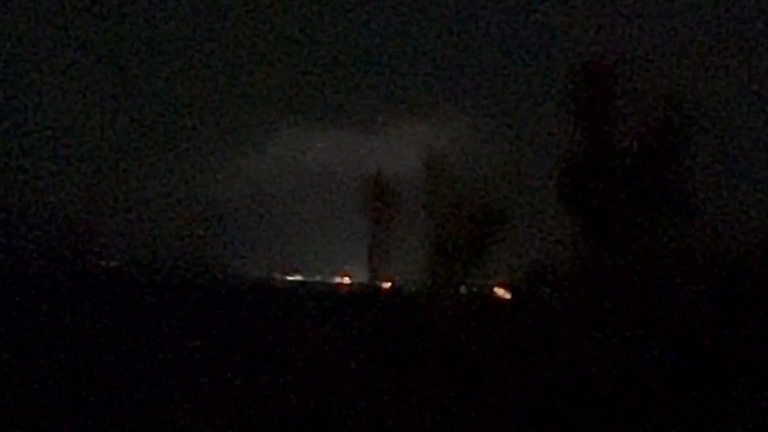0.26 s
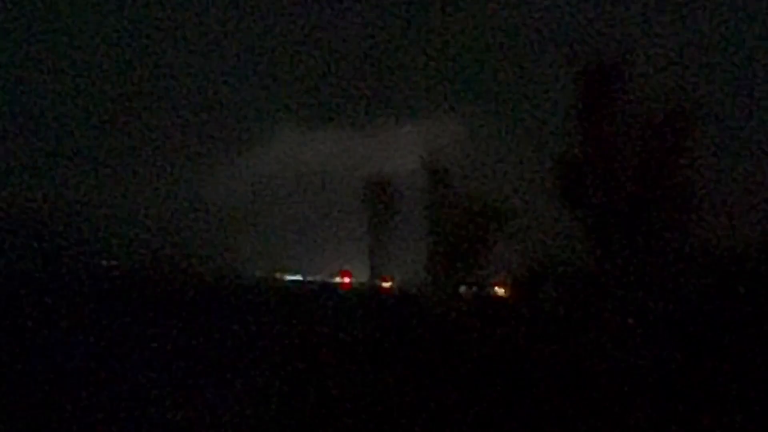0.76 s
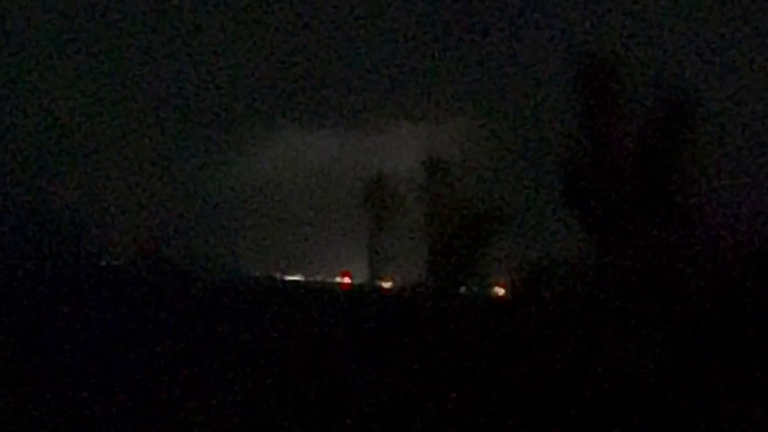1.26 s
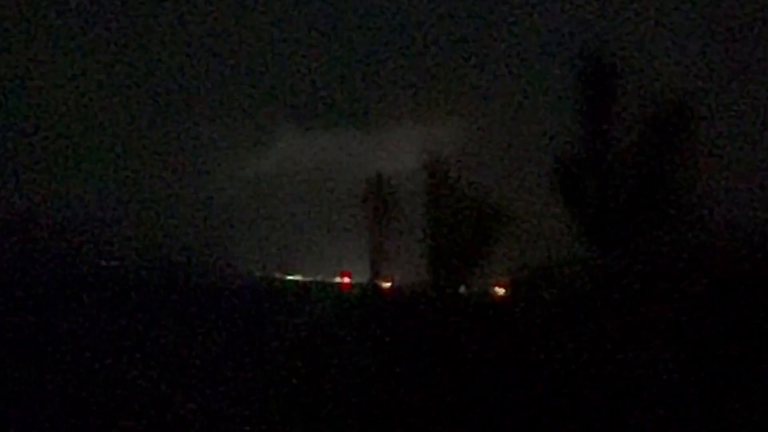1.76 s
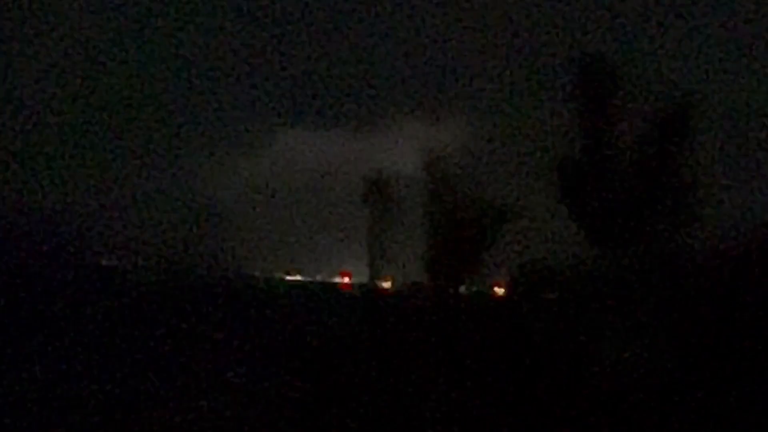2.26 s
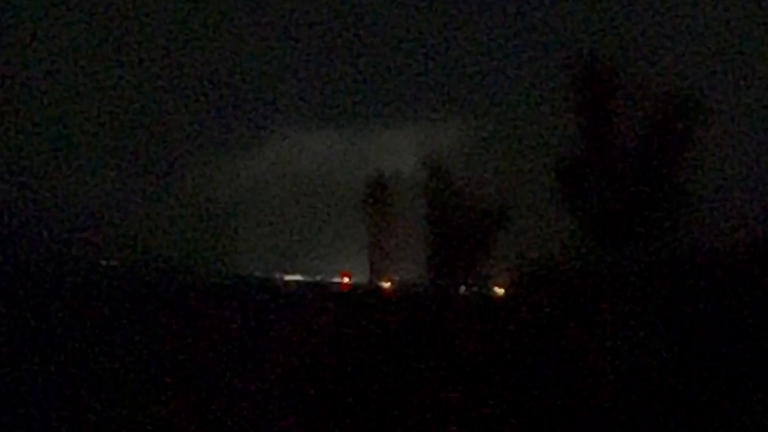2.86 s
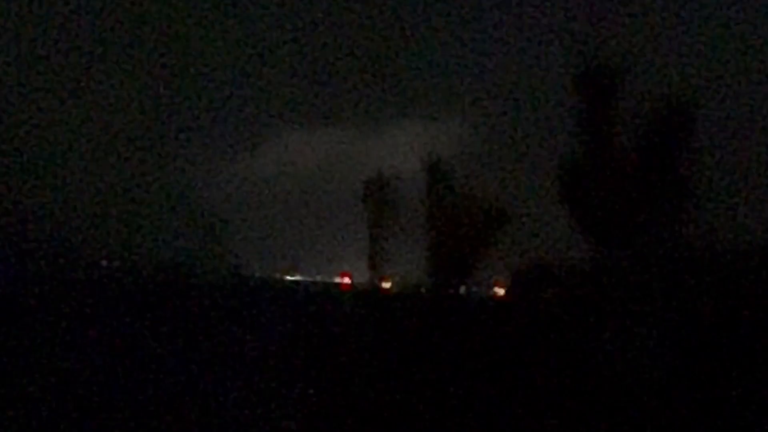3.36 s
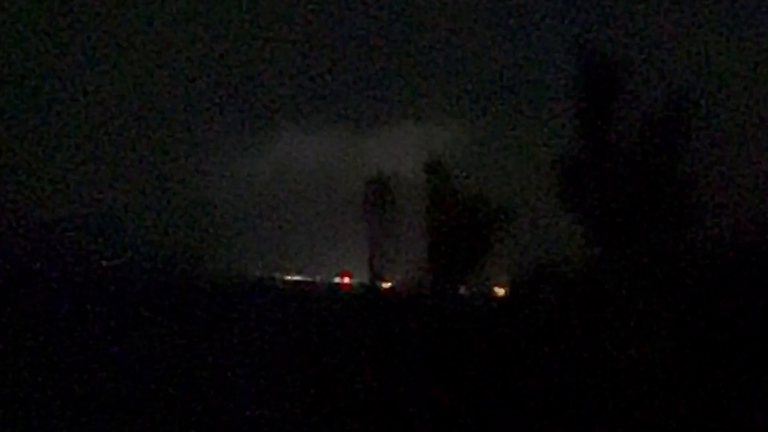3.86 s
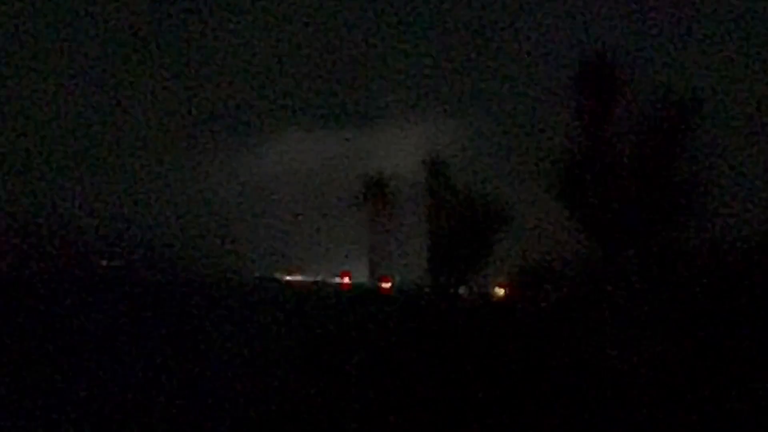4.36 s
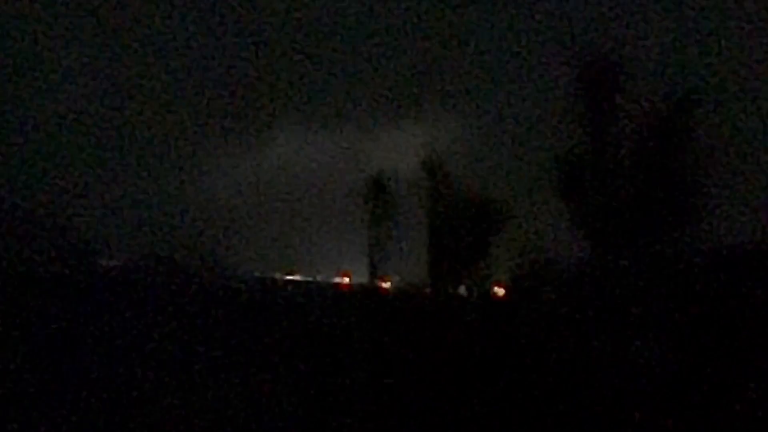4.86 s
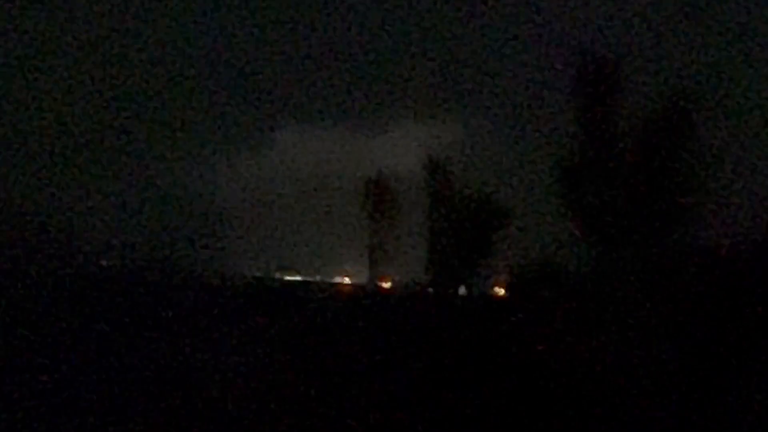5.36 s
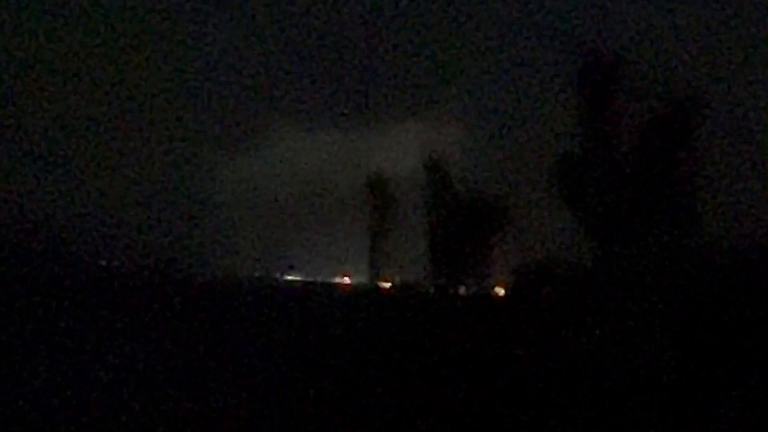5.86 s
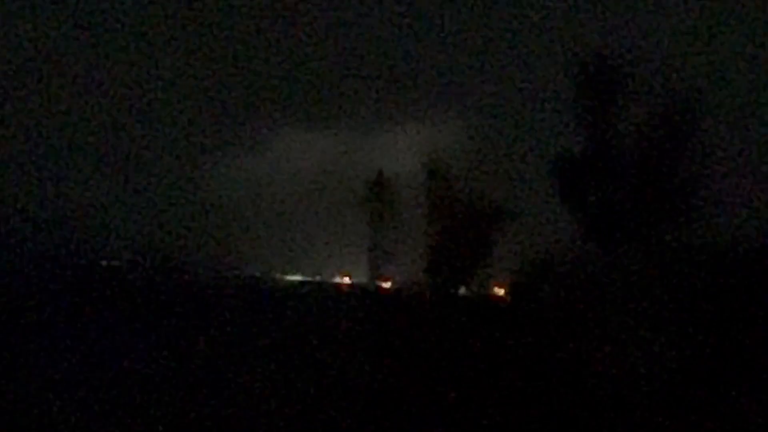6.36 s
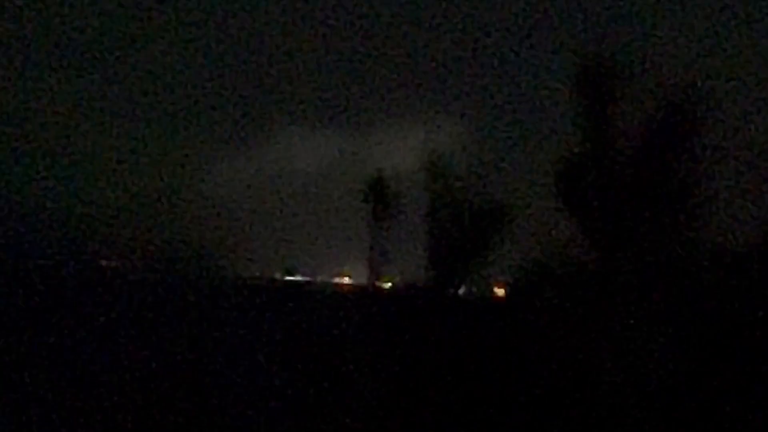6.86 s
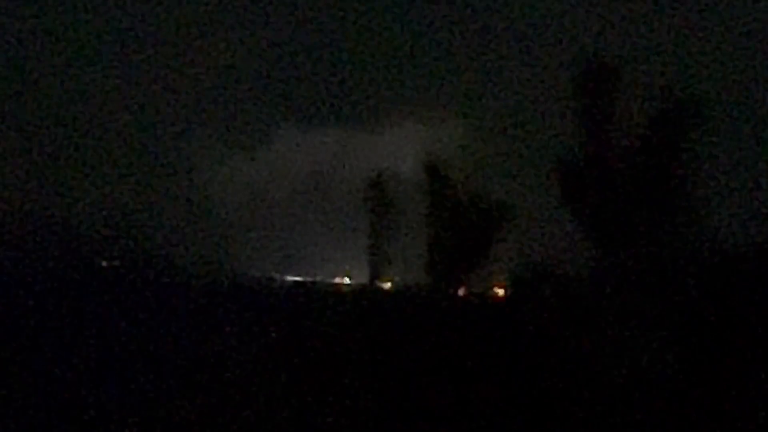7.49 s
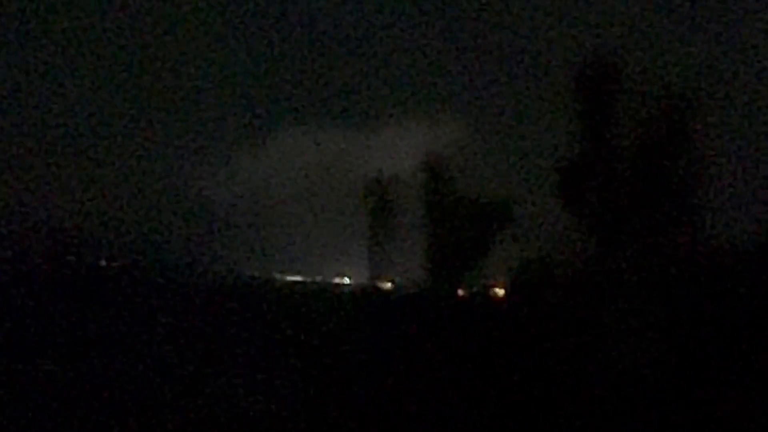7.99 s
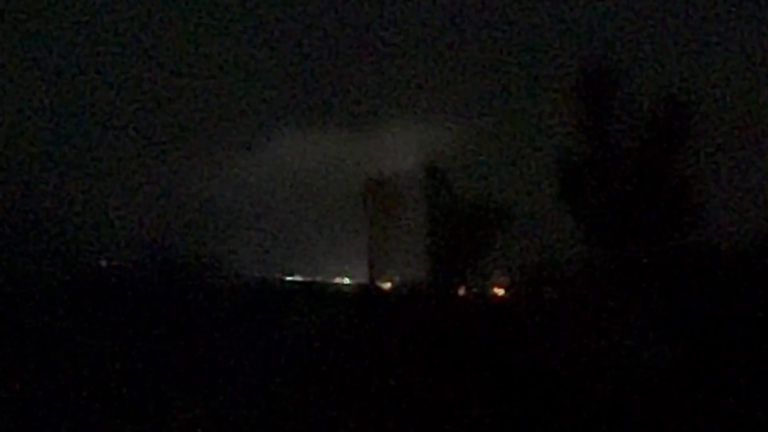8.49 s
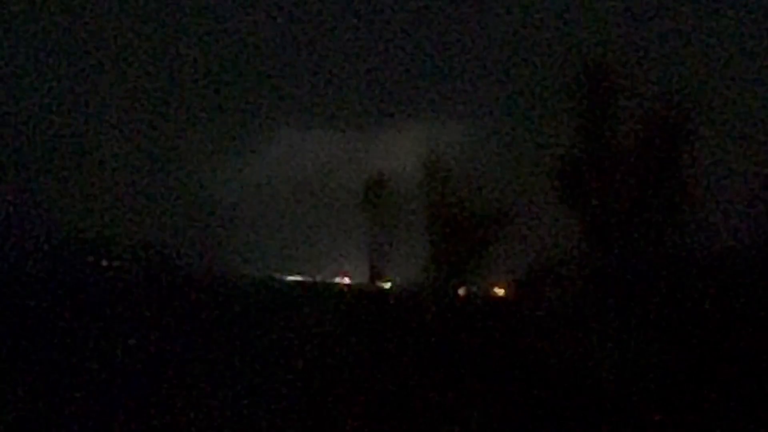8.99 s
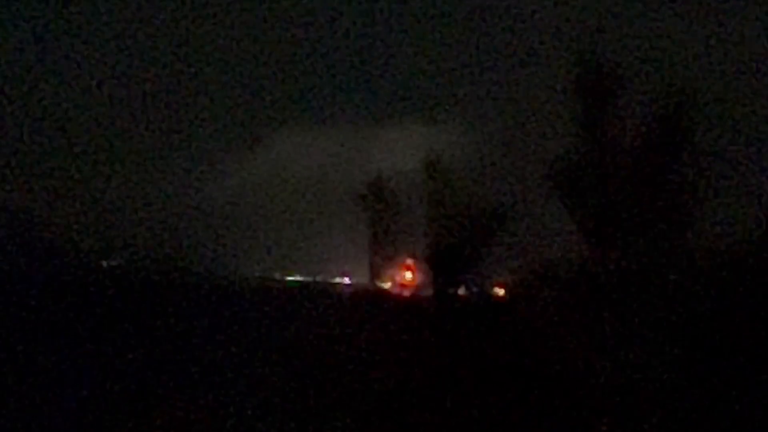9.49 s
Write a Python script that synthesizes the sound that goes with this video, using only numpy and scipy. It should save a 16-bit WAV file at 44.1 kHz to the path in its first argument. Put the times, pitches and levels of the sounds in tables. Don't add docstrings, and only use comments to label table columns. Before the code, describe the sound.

A dense cricket chorus trills over a dark field with faint far-road hum, while distant fireworks thud softly, strongest near seven seconds.

```python
import sys
import numpy as np
from scipy import signal
from scipy.fft import rfft, irfft, next_fast_len
from scipy.io import wavfile
from scipy.ndimage import map_coordinates

SR = 44100
rng = np.random.default_rng(int(sys.argv[2]) if len(sys.argv) > 2 else 0)


def magnitude_from_level(level_db):
    exponent = np.asarray(level_db, float) / 20
    return 10 ** exponent


def generate_wav(signal):
    frames = np.transpose(np.atleast_2d(signal))
    scaled = np.clip(frames, -1, 1) * 32767
    pcm = np.round(scaled).astype(np.int16)
    wavfile.write(sys.argv[1], SR, pcm)


N = 429093

# [f/Hz, density/dB]
AIR_COLOUR = [(100, -20), (170, 0), (600, -1), (1200, -6), (1600, -11), (1950, -10), (2700, -15),
              (4000, -18), (5000, -12), (6500, -13), (7300, -20), (8100, -28), (10000, -29), (12500, -33),
              (14500, -37), (16000, -36)]
# [f/Hz, likeness 0-1]
AIR_LIKENESS = [(60, 0.2), (170, 0.98), (500, 0.84), (1000, 0.34), (1550, 0), (1900, 0.74), (4000, 0.8),
                (6000, 1), (6900, 0.1), (7600, 0.58)]
# [t/s, level/dB]
ROAD_LEVEL = [
    (0, -54),
    (.92, -55.5),
    (2.65, -55),
    (3.06, -56.5),
    (4.66, -55),
    (5.85, -56),
    (6.48, -54.5),
    (7.07, -56),
    (9.73, -55.5),
]
# [f/Hz, density/dB]
ENGINE_COLOUR = [(22, -34), (35, -19), (48, -4), (61, 4), (74, -5), (86, 1), (100, -9), (125, -12),
                 (150, -11), (200, -40)]
# [t/s, level/dB]
ENGINE_LEVEL = [
    (0, -48),
    (.24, -58),
    (.73, -56.5),
    (4.5, -56.5),
    (6.72, -55.5),
    (7.45, -54),
    (8.7, -56),
    (9.73, -58.5),
]
# [t/s, peak level/dB, pitch f/Hz, cycles, rolling tail level/dB]
BLASTS = [(0.142, -39.5, 64, 3.6, -7), (0.349, -40, 60, 3.4, -10), (0.503, -40, 49, 3, -16),
          (.705, -44, 70, 3.3, -15), (6.879, -36.5, 205, 4.7, 0.5), (6.8897, -20.5, 115, 1.25, -19),
          (6.9005, -27.5, 68, 1.6, -14), (6.92, -27.5, 62, 2.2, -13), (7.135, -41, 68, 3.5, -12),
          (6.968, -52, 62, 2.1, 4.5), (7.01, -34, 80, 0.73, -21), (7.096, -45, 110, 2.4, -8.5),
          (7.294, -37.5, 75, 1.9, -13.5), (7.999, -40.5, 59, 3.8, -12.5), (8.61, -41, 47.6, 3.5, -15),
          (8.759, -43.5, 77, 2.7, -10), (9.456, -38, 65.4, 1.8, -19)]
# [f/Hz, t60/s]
ROLL_DECAY = [(40, 1), (90, 1), (200, 0.31), (500, 0.41)]
# [f/Hz, density/dB]
ROLL_TONE = [(30, -15.5), (60, 13), (100, -14), (250, -10.5), (500, -20.5), (900, -69)]
# [t/s, strokes made so far]
RASP_PACE = [
    (.047, 0),
    (1.038, 13),
    (1.94, 25),
    (2.45, 32),
    (3.482, 46),
    (4.185, 56),
    (5.007, 68),
    (5.337, 73),
    (5.52, 76),
]
# [start t/s, end t/s, level/dB]
FAST_RUNS = [(5.56, 5.75, -59), (5.79, 5.82, -58), (5.86, 6.13, -59), (6.17, 6.54, -59), (6.57, 6.86, -58),
             (6.88, 6.95, -63), (6.967, 7.237, -60), (7.257, 7.296, -60), (7.36, 7.56, -61),
             (7.58, 7.607, -60), (7.78, 7.8, -62), (8.7, 8.78, -63), (9.38, 9.45, -64), (9.626, 9.663, -60)]
# [f/Hz, density/dB]
RASP_TONE = [(11500, -20), (12400, -5), (13300, -2.5), (14100, 11), (14800, 6), (15400, 10.5), (17000, -4)]
# [first stroke t/s, end t/s, strokes per s]
BUZZES = [
    (.01, 1.71, 38.),
    (1.893, 9.73, 38.17),
]
# [start t/s, length/s, first f/Hz, last f/Hz, peak level/dB]
SOFT_TRILLS = [(.05, .47, 4590, 4490, -52), (.5, .56, 4480, 4450, -62), (.8, .42, 4570, 4520, -49.5),
               (0, .45, 4440, 4430, -54), (1.09, .66, 4470, 4380, -54), (1.31, .32, 4790, 4710, -55.5),
               (2.52, .44, 4790, 4710, -55.5), (3.49, .45, 4790, 4710, -57), (4.41, .5, 4780, 4710, -56.5),
               (5.36, .55, 4790, 4710, -56.5), (6.35, .45, 4780, 4710, -57), (8.3, .45, 4580, 4490, -51),
               (8.7, .5, 4480, 4490, -61), (9.16, .5, 4570, 4500, -49), (9.5, .23, 4490, 4440, -57)]
# [last stroke t/s, first stroke level/dB, lead-in earlier by/s, lead-in level/dB]
HIGH_VOICE = [(.204, -44, .164, -50), (.808, -44, .255, -49), (2.167, -46, .238, -48),
              (2.714, -44, .254, -50), (3.946, -47, .246, -50), (4.409, -44, .166, -48),
              (5.01, -44, .26, -50), (6.324, -46, .251, -48), (6.876, -44, .246, -51),
              (8.374, -46, .247, -48), (8.95, -44, .253, -47)]
# [t/s, peak level/dB]
LONE_LEAD_INS = [
    (1.65, -52),
    (3.2, -53),
    (7.975, -49),
]
# [t/s, peak level/dB of the overtone]
LOW_VOICE = [(0.151, -59), (0.274, -60), (0.673, -59), (0.819, -56), (0.913, -55), (2.237, -57),
             (2.385, -64), (2.449, -60), (2.861, -61), (3.021, -58), (4.422, -58), (4.567, -57),
             (5.004, -58), (5.067, -53), (5.188, -63), (6.097, -60), (6.437, -58), (6.578, -59),
             (6.643, -60), (7.132, -58), (7.287, -54), (7.408, -64), (7.712, -60), (8.511, -55),
             (8.651, -58), (8.718, -62), (9.185, -58), (9.334, -58), (9.453, -65)]
# [f/Hz, level/dB]
SINGERS = [(4890, -22), (4990, -24), (5090, -15.5), (5190, -11.5), (5270, -5.5), (5350, -4.5), (5420, -3),
           (5480, -1.5), (5520, 2), (5580, -16.5), (5650, -9), (5710, -10.5), (5780, -20), (5890, -25)]
# [t/s, depth/dB]
CHORUS_LULLS = [(.13, 3.5), (.44, 3.5), (.71, 3.5), (1.11, 5.5), (1.4, 2.5), (1.55, 5), (2.12, 4.5),
                (2.46, 5.5), (2.75, 3), (3.1, 1.5), (3.37, 3.5), (3.65, 0), (4.08, 4), (4.38, 3), (4.72, 6),
                (5.03, 4), (5.22, 4), (5.51, 3.5), (5.69, 3), (5.88, 2.5), (6.17, 1), (6.78, 5), (7.07, 1),
                (7.39, 2.5), (7.75, 1.5), (8.11, 5.5), (8.41, 4), (9.09, 2.5), (9.37, 5), (9.63, 7)]
# [first stroke t/s, last stroke t/s, peak level/dB]
NEAREST_SINGER = [(0.256, .285, -27), (.387, .387, -26.5), (0.764, .79, -30), (0.837, .886, -33),
                  (1.901, 2.037, -27.5), (2.25, 2.27, -26), (2.318, 2.374, -27.5), (2.808, 2.806, -30),
                  (2.881, 2.955, -30.5), (3.039, 3.039, -28), (3.222, 3.249, -29.5), (3.495, 3.495, -40),
                  (3.751, 3.753, -31), (4.188, 4.207, -28.5), (4.316, 4.317, -24), (4.453, 4.503, -30.5),
                  (4.638, 4.661, -27), (4.799, 4.981, -28.5), (5.11, 5.157, -28.5), (5.93, 5.93, -26),
                  (6.054, 6.08, -34), (6.3, 6.373, -31), (6.547, 6.622, -28), (6.836, 6.861, -29.5),
                  (7.464, 7.539, -28.5), (8.219, 8.245, -28.5), (8.352, 8.351, -31), (8.639, 8.639, -30),
                  (8.993, 8.993, -24), (9.201, 9.284, -28)]
# [f/Hz, lead/rad]
LEFT_LEAD = [(400, 0), (1400, 1), (1750, 5.8), (2600, 8.7), (3900, 7.1), (4450, 7.75), (5080, 7.85),
             (5500, 8.8), (5860, 9.4), (6050, 9.78), (6900, 10.4), (7300, 12.5), (8200, 12.6), (9750, 15.7),
             (10300, 15.7), (12300, 18.8), (12850, 18.9), (15700, 23.2)]
# [f/Hz, level difference/dB]
LEFT_TILT = [(380, 0), (700, 3), (1290, 4.5), (2380, 1.5), (4400, 0)]


def unit(x):
    return x / np.sqrt(np.mean(x ** 2) + 1e-20)


def along(points, hz):
    f, v = np.transpose(points)
    return np.interp(np.log(hz + 1), np.log(f + 1), v)


def curve(rows):
    return np.interp(np.arange(N) / SR, *np.transpose(rows))


def filtered(x, response):
    m = next_fast_len(N + 8192)
    return irfft(rfft(x, m) * response(np.fft.rfftfreq(m, 1 / SR)), m)[..., :N]


def hiss(spectrum, channels=1):
    white = rng.standard_normal((channels, N))
    return unit(filtered(white, lambda hz: magnitude_from_level(along(spectrum, hz))))


def laid(centre_s, rows):
    length = rows.shape[1]
    centre = np.round(np.asarray(centre_s) * SR).astype(int)
    at = centre[:, None] + np.arange(length) - length // 2
    inside = (at >= 0) & (at < N)
    return np.bincount(at[inside], rows[inside], N)


def dips(centre_s, depth_db, width_s):
    u = np.arange(-3 * width_s, 3 * width_s, 1 / SR) / width_s
    return magnitude_from_level(-laid(centre_s, np.outer(depth_db, np.exp(-u ** 2))))


def strokes(centre_s, db, hz, length_s, fall, overtone_db, flat=1., scatter=0.0033):
    u = np.linspace(0, 1, int(length_s * SR))
    luck = rng.standard_normal((len(centre_s), 2))
    hz = np.asarray(hz) * (1 + scatter * luck[:, 0])
    glide = hz[:, None] * (1 + fall * (.33 - u ** 2))
    phase = 2 * np.pi * (np.cumsum(glide, axis=1) / SR + luck[:, 1:])
    shape = np.sin(np.pi * u) ** flat
    tone = np.sin(phase) + magnitude_from_level(overtone_db) * np.sin(2 * phase)
    return laid(centre_s, magnitude_from_level(db)[:, None] * shape * tone)


def night_air():
    turn = lambda hz: np.arccos(np.clip(along(AIR_LIKENESS, hz), 0, 1)) / 2
    spread = lambda hz: np.array([np.cos(turn(hz)), np.sin(turn(hz))])
    mid, side = filtered(hiss(AIR_COLOUR, channels=2), spread)
    air = np.array([mid + side, mid - side])
    shared, apart = hiss(ENGINE_COLOUR, channels=2)
    drone = shared + magnitude_from_level(-26.5) * np.array([apart, -apart])
    return magnitude_from_level(curve(ROAD_LEVEL) + 3.5) * air + magnitude_from_level(curve(ENGINE_LEVEL) + 4.5) * drone


def thumps():
    total, t = np.zeros(N + SR), np.arange(SR) / SR
    for s, db, hz, cycles, roll_db in BLASTS:
        u = t * hz / cycles
        push = np.sin(2 * np.pi * hz * t) * 4 * u * np.exp(1 - 4 * u * u - u)
        bins, frames, z = signal.stft(rng.standard_normal(SR), SR, nperseg=1024)
        decay_db = 60 * frames / along(ROLL_DECAY, bins)[:, None]
        z = z * magnitude_from_level(along(ROLL_TONE, bins)[:, None] - decay_db)
        roll = signal.istft(z, SR, nperseg=1024)[1][:SR]
        roll = roll * (1 - np.exp(-(t / 0.011) ** 2))
        total[round(s * SR):][:SR] += magnitude_from_level(db) * (push + magnitude_from_level(roll_db) * roll / np.std(roll[:SR // 10]))
    return total[:N]


def bush_cricket():
    when, made = np.transpose(RASP_PACE)
    luck = rng.standard_normal((int(made[-1]) + 1, 2))
    s = np.interp(np.arange(len(luck)), made, when) + 0.0022 * luck[:, 0]
    db = -54 + 3.1 * luck[:, 1]
    u = np.linspace(0, 1, int(0.025 * SR))
    gate = laid(s - .006, magnitude_from_level(db + 4)[:, None] * u ** 1.3 * np.sqrt(1 - u ** 4))
    t = np.arange(N) / SR
    beat = 1 - 0.84 * np.cos(np.pi * 58 * t + 1.3 * np.sin(2 * np.pi * 2.5 * t)) ** 4
    for start, end, db in FAST_RUNS:
        gate += magnitude_from_level(db) * beat * np.clip(np.minimum(t - start, end - t) / .004, 0, 1)
    return gate * hiss(RASP_TONE)[0]


def buzzer():
    s = np.concatenate([np.arange(first, end, 1 / pace) for first, end, pace in BUZZES])
    db = -62 + rng.normal(0, 0.33, len(s))
    return strokes(s, db, np.full(len(s), 8720), 0.017, 0.077, -60)


def trillers():
    total = np.zeros(N)
    for start, length, first_hz, last_hz, peak_db in SOFT_TRILLS:
        s = np.arange(.012, length, 1 / 45)
        u = s / length
        hz = first_hz + (last_hz - first_hz) * u ** 0.8
        db = peak_db - 5 * (1 - u) ** 8 - 4 * u - 7 * u ** 4 + rng.normal(0, 1.5, len(s))
        total += strokes(start + s, db, hz, .024, 0.0073, -37, flat=1.04)
    return total


def chirpers():
    step_s, full_db = .054, -43.5
    rows = list(LONE_LEAD_INS)
    for last, first_db, lead_s, lead_db in HIGH_VOICE:
        rows += [(last - lead_s, lead_db), (last - 2 * step_s, first_db)]
        rows += [(last - step_s, full_db), (last, full_db)]
    s, db = np.transpose(rows)
    hz = np.where(db < -46.5, 5915, np.where(db < -45.5, 5985, 6025))
    high = strokes(s, db + 2.5, hz, .034, .015, -26, flat=.5, scatter=.001)
    s, db = np.transpose(LOW_VOICE)
    low = strokes(s + .005, db + 15.5, np.full(len(s), 5370), 0.055, 0.043, -14.5, flat=0.8)
    return high + low


def nearest_singer():
    pace = 38.5
    rows = []
    for first, last, db in NEAREST_SINGER:
        count = 1 + round((last - first) * pace)
        rows += [(at, db) for at in np.linspace(first, last, count)]
    s, db = np.transpose(rows)
    db = db + 1.7 * rng.standard_normal(len(s))
    return strokes(s, db - 3, np.full(len(s), 5505), .02, .018, -33, flat=.6)


def chorus():
    total = np.zeros(N)
    for hz, level_db in SINGERS * 2:
        s = np.cumsum(rng.normal(1, .03, 420)) / rng.normal(38.5, .6) - rng.uniform(.03, .06)
        swell_db = 3 * map_coordinates(rng.standard_normal(70), [np.abs(s) * 6])
        db = level_db + swell_db + rng.normal(0, 2.1, len(s))
        own_hz = np.full(len(s), hz + rng.normal(0, 10.3))
        total += strokes(s, db, own_hz, .017, 0.041, -30.5)
    near = nearest_singer()
    rests = dips(*np.transpose(CHORUS_LULLS), 0.044)
    return magnitude_from_level(-37) * rests * unit(total) + near


def grass(x):
    t = np.arange(SR // 4) / SR
    tail = rng.standard_normal((2, len(t))) * magnitude_from_level(-60 * t / .2)
    return signal.fftconvolve(x[None], tail / np.linalg.norm(tail[0]), axes=1)[:, :N]


def scene():
    insects = chorus() + chirpers() + trillers() + buzzer() + bush_cricket()
    return insects + magnitude_from_level(-17) * grass(insects) + thumps() + night_air()


def top_cut(x):
    return signal.sosfilt(signal.butter(12, 15830, fs=SR, output="sos"), x)


def record(dry):
    half = lambda hz: magnitude_from_level(along(LEFT_TILT, hz) / 2) * np.exp(.5j * along(LEFT_LEAD, hz))
    capsule = lambda hz: (1j * hz / (1j * hz + 34)) ** 3
    heard = filtered(dry, lambda hz: capsule(hz) * np.array([half(hz), 1 / half(hz)]))
    return top_cut(heard)


dry = scene()
out = record(dry)
generate_wav(out)
```